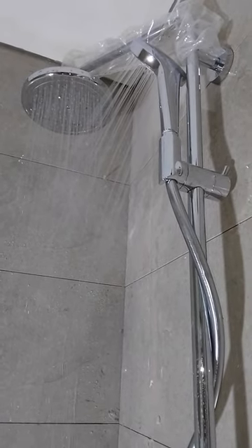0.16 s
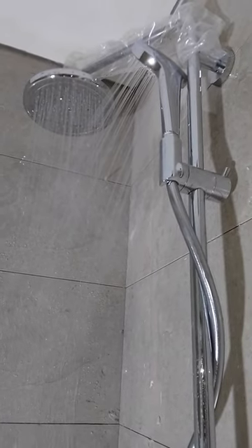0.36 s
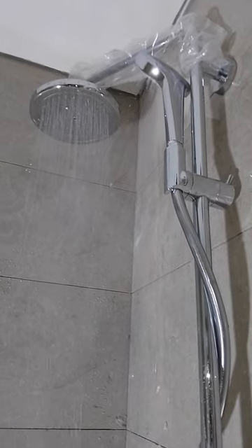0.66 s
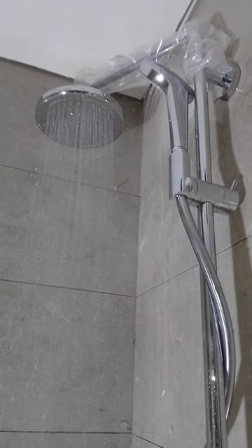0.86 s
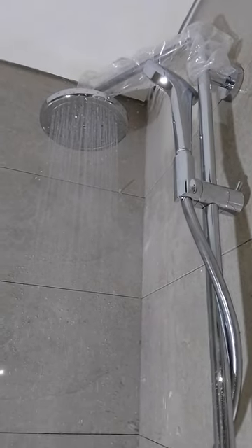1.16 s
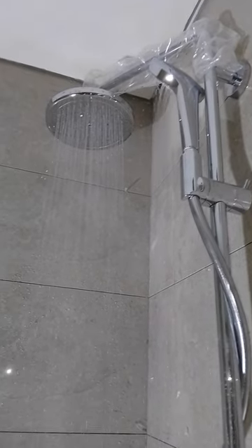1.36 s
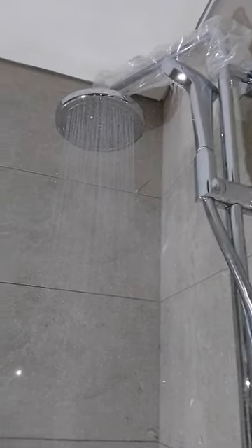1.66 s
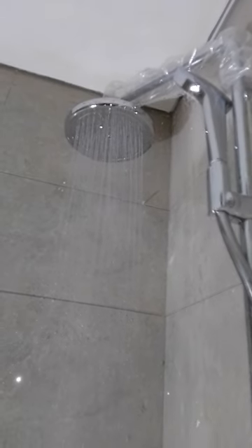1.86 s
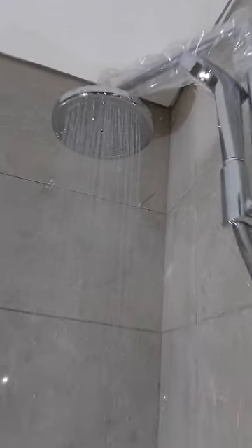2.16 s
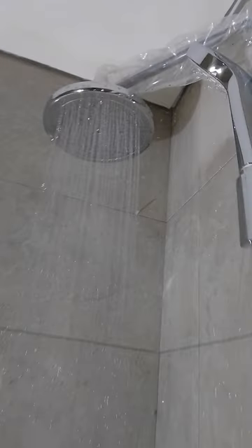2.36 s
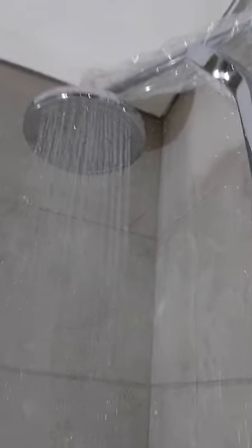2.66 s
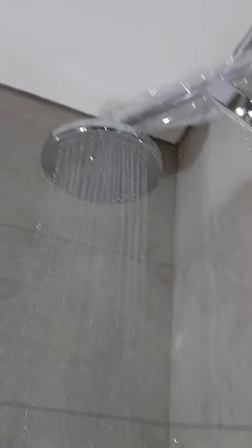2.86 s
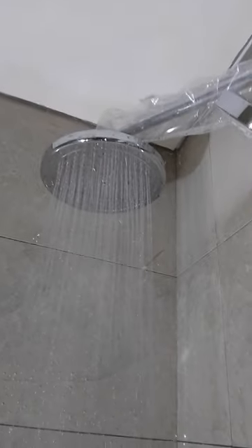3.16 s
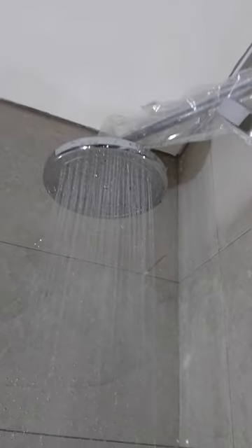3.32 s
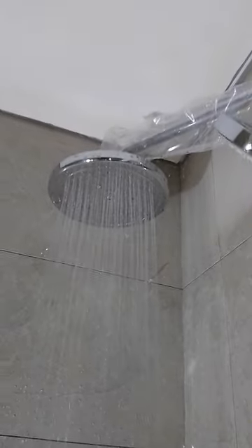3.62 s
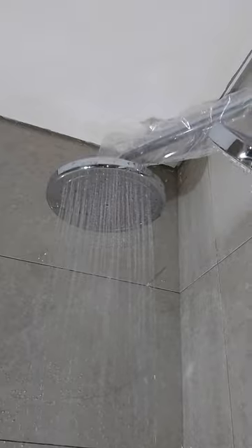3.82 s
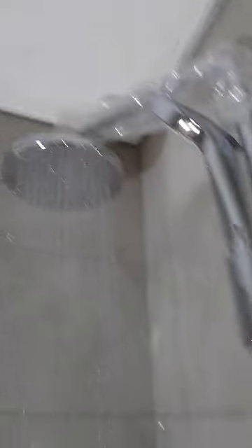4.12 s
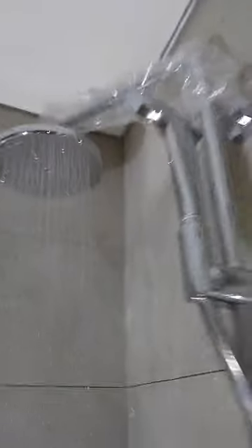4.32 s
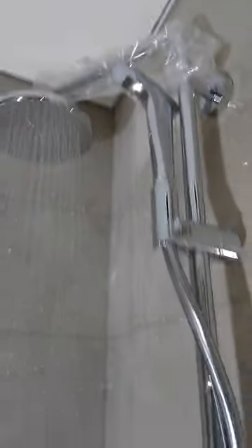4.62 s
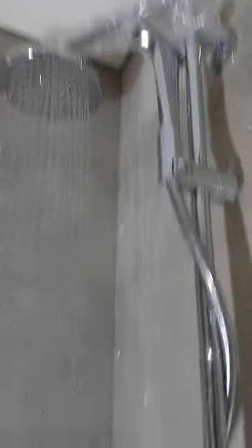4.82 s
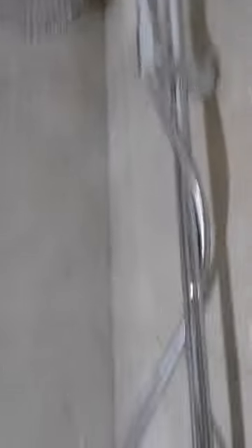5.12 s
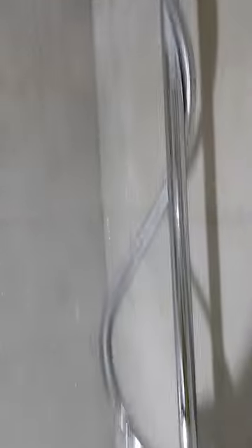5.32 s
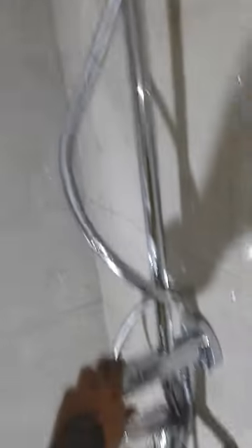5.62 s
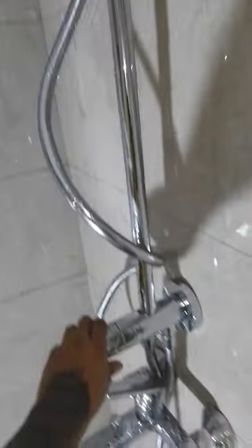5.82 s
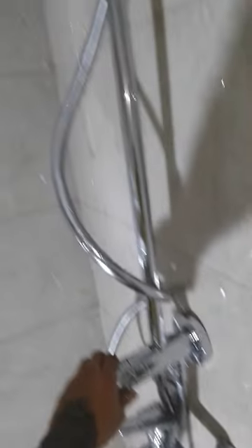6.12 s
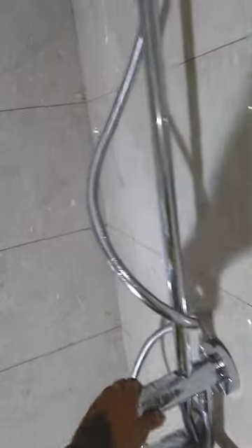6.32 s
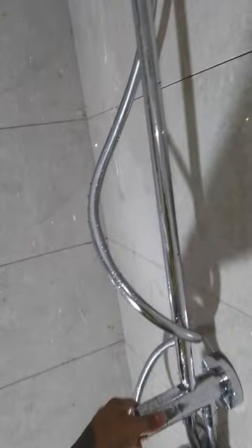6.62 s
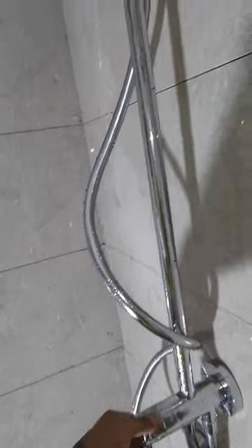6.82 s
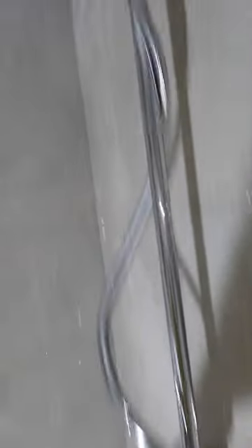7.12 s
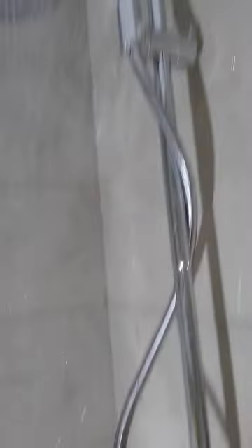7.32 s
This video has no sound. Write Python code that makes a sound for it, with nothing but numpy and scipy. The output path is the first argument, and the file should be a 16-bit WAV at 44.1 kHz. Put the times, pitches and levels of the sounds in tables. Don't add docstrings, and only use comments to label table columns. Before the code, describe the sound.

Crisp, airy shower water patters on tile, crackling with near drops, thinned by a phone's noise reduction, over a barely audible low hum.

```python
import sys
import numpy as np
from scipy import signal
from scipy.fft import rfft, irfft, next_fast_len
from scipy.io import wavfile
from scipy.ndimage import uniform_filter1d, minimum_filter1d, map_coordinates

SR = 44100
rng = np.random.default_rng(int(sys.argv[2]) if len(sys.argv) > 2 else 0)


def transcribe(signal):
    frames = np.atleast_2d(signal).T
    limited = np.clip(frames, -1, 1)
    pcm = np.round(limited * 32767).astype(np.int16)
    wavfile.write(sys.argv[1], SR, pcm)


def rack_gain(trim_db):
    fader = np.asarray(trim_db, float)
    return 10 ** (fader / 20)


N = 329868


def unit(x):
    return x / np.sqrt(np.mean(x ** 2) + 1e-20)


def curves(rows, times):
    s, *cols = np.transpose(rows)
    return [np.interp(times, s, c) for c in cols]


def wobble(rate):
    knot_position = np.arange(N) * np.clip(rate, .1, 120) / SR
    return map_coordinates(rng.standard_normal(1000), [knot_position])


def coloured(x, points):
    m = next_fast_len(N + 8192)
    f, db = np.transpose([(1, -120)] + list(points) + [(SR / 2, -60)])
    hz = np.fft.rfftfreq(m, 1 / SR)
    gain = rack_gain(np.interp(np.log(hz + 1), np.log(f + 1), db))
    cepstrum = irfft(np.log(gain), m)
    cepstrum[1:m // 2] *= 2
    cepstrum[m // 2 + 1:] = 0
    return irfft(rfft(x, m) * np.exp(rfft(cepstrum)), m)[:N]


def field(shape, bins, frames):
    rows = np.arange(shape[0]) / np.clip(bins, 1.5, 50)
    cols = np.arange(shape[1]) / np.clip(frames, 1.5, 50)
    knots = rng.standard_normal((shape[0], shape[1]))
    knots = knots[:int(rows[-1]) + 2, :int(cols[-1]) + 2]
    return unit(map_coordinates(knots, np.meshgrid(rows, cols, indexing="ij"), order=2))


def patchy(x, patchy_db):
    z = signal.stft(x, nperseg=256)[2]
    gain = rack_gain(patchy_db * field(z.shape, bins=5.97, frames=12))
    return unit(signal.istft(z * gain, nperseg=256)[1][:N])


def droplets(count, top_hz, spread_db, life, hiss):
    when, pitch, size, turn = rng.random((count, 4)).T[:, :, None]
    n = np.arange(96)
    tone = np.sin(2 * np.pi * (pitch * top_hz * n / SR + turn))
    ring = tone * (1 - np.exp(-n / 2)) * np.exp(-n / (life * SR))
    loudness = rack_gain(-spread_db * np.log(size + 0.02))
    places = (when * N).astype(int) + n
    rings = np.bincount(places.ravel(), (loudness * ring).ravel(), N)[:N]
    return unit(rings) + hiss * rng.standard_normal(N)


def spray(near, facing, flutter):
    # (frequency [Hz], level [dB])
    spray_colour = [(2500, -33.5), (4500, -20), (6000, -13.5), (8000, -8.5), (9400, -3.5), (10400, 0),
                    (11800, -3), (13500, -6.5), (15700, -9.5), (17000, -16.5)]
    patter = droplets(count=16000, top_hz=17150, spread_db=1.5, life=0.00028, hiss=1.58)
    patter = patchy(coloured(patter, spray_colour), patchy_db=0.79)
    body = signal.sosfiltfilt(signal.butter(2, 8000, fs=SR, output="sos"), patter)
    patter = patter + (rack_gain(facing) - 1) * body
    return rack_gain(-19.5 + near + flutter) * patter


def splash(near, flutter):
    # (frequency [Hz], level [dB])
    splash_colour = [(600, -28.5), (1200, -11.5), (2000, -7.5), (3000, -2.5), (4200, 2), (6000, -12)]
    # (time [s], level [dB])
    sloshes = [
        (.237, 6.5),
        (1.36, 1.5),
        (2.65, 4.5),
        (3.77, 0.5),
        (5.13, 3),
        (5.71, 0),
        (6.23, 2),
        (7.4, 4.5),
    ]
    rise_s, fall_s = 0.012, 0.061
    t = np.arange(N) / SR
    level_db = -40 + 0.98 * near + 0.45 * wobble(8)
    for s, db in sloshes:
        level_db += db * np.exp(np.where(t < s, (t - s) / rise_s, (s - t) / fall_s))
    drops = droplets(count=5000, top_hz=6290, spread_db=3.0, life=0.0005, hiss=3.8)
    drops = patchy(coloured(drops, splash_colour), patchy_db=-0.5)
    return rack_gain(level_db + 0.56 * flutter) * drops


def drain(near, facing):
    # (frequency [Hz], level [dB])
    drain_colour = [(175, -27), (215, -5), (290, 0), (500, 0), (900, -2), (1500, -5), (3000, -3)]
    level_db = -52.5 + 0.23 * near + 0.55 * facing + 0.81 * wobble(8)
    rush = patchy(coloured(rng.standard_normal(N), drain_colour), patchy_db=-0.54)
    return rack_gain(level_db) * rush


def water():
    # (time [s], level [dB])
    flow = [(0, -18.5), (.08, -23.5), (.3, -24.5), (.6, -22.5), (1.15, -22), (1.35, -19.5), (1.7, -18.5),
            (2.35, -19.5), (2.6, -19), (3.6, -19), (4.1, -19), (4.9, -19.5), (5.4, -20), (5.65, -22),
            (6.75, -21), (7.0, -24), (7.2, -25.5), (7.48, -23)]
    # (time [s], level below 8 kHz [dB])
    turning = [(0, -1), (1.2, -1), (2, -3.5), (3, -1.5), (4, -2), (5, -3), (5.5, 2), (5.9, 5), (6.2, 2),
               (6.8, 3), (7.1, 4), (7.48, -3.5)]
    # (time [s], level [dB])
    surges = [(.11, -1), (.37, 3.5), (.6, 1.5), (.68, -2.5), (.81, 1), (1.06, -2), (1.17, -1.5),
              (1.21, 2.5), (1.26, -4), (1.295, 2), (1.34, 1.5), (1.63, 1), (2.12, 3.5), (2.3, 1.5),
              (2.68, 3.5), (2.87, -2), (2.99, 3), (3.04, 0), (3.17, 0.5), (3.21, -2), (3.29, -3), (3.44, 0),
              (3.8, -3), (3.97, -2.5), (5.14, -1.5), (5.39, 3), (5.48, -2.5), (5.63, -2), (5.79, 3),
              (7.23, -3), (7.35, -1.5)]
    spit_s = 0.013
    t = np.arange(N) / SR
    near = curves(flow, t)[0] + 19.5
    facing = curves(turning, t)[0]
    spits = sum(db * np.exp(-((t - s) / spit_s) ** 2) for s, db in surges)
    flutter = 0.31 * wobble(14) + 0.23 * wobble(45) + spits
    return spray(near, facing, flutter) + splash(near, flutter) + drain(near, facing)


def rumble():
    # (frequency [Hz], level [dB])
    rumble_colour = [(15, -19), (30, -13), (46, -5), (56, -5), (70, -11.5), (110, -7.5), (160, -24.5),
                     (250, -40)]
    t = np.arange(N) / SR
    pipe = rack_gain(-84 + 3 * wobble(6)) * np.sin(2 * np.pi * 887 * t + 2.3 * wobble(25))
    mains = rack_gain(-71 + 2.5 * wobble(9)) * np.sin(2 * np.pi * 51 * t + 1.2 * wobble(8))
    pulsing = rack_gain(-65 + 1.2 * wobble(7.7) + 1.3 * wobble(17))
    return pulsing * unit(coloured(rng.standard_normal(N), rumble_colour)) + pipe + mains


def bursts():
    # (time [s], peak level [dB], pitch [Hz])
    nearest = [(0.154, -12, 10800), (0.191, -16, 10700), (0.2268, -10, 10100), (0.3561, -3, 8800),
               (0.664, -11, 10700), (0.7636, -13, 9800), (0.9755, -7, 11200), (1.0212, -11, 13700),
               (1.129, -2, 9700), (1.2383, -2, 10200), (1.457, -8, 9900), (1.7022, -6, 10400),
               (2.5455, 1, 10500), (2.5856, -12, 9900), (2.5921, 1, 10500), (2.782, -11, 10100),
               (2.7954, -5, 10200), (2.901, -2, 11000), (2.9079, -1, 10100), (2.9263, -4, 10800),
               (2.9434, -10, 10400), (3.178, -2, 9800), (3.2227, -7, 9900), (3.2549, 2, 9750),
               (3.4534, 1, 11400), (3.7276, -7, 13000), (3.767, -6, 12000), (3.7759, -1, 10800),
               (3.852, -2, 8700), (3.9296, 0, 10200), (4.0599, -6, 10000), (4.1756, -2, 10700),
               (4.1839, -1, 11100), (4.2165, -15, 11400), (4.4211, -2, 10100), (4.555, -5, 10900),
               (4.7266, -8, 9800), (5.7236, -9, 9100), (5.7954, -4.5, 10700), (5.9381, -8, 9300),
               (6.0388, -5, 9200), (6.1338, -7, 10700), (6.15, -6, 13500), (6.25, -1, 11200),
               (6.2862, 2, 10200), (6.2937, -4, 10500), (6.4289, -7, 9500), (6.497, -12, 10500),
               (6.5067, -9, 10700), (6.6918, -2, 11000), (6.7949, -2, 10300), (6.8178, -7, 10900),
               (6.8914, -2, 10900), (6.9456, -17, 10100), (6.9859, -7, 10800), (7.062, -9, 10500),
               (7.1287, -15, 9200), (7.2684, -9, 11000), (7.3029, -8, 10000), (7.3995, -8, 10600)]
    # (time [s], peak level [dB], pitch [Hz])
    more_near = [(0.0324, -14, 10200), (0.2806, -11, 11900), (0.5069, -10, 10600), (0.5292, -9, 10200),
                 (0.7488, -13, 10700), (0.7917, -12, 11500), (0.8175, -9, 11000), (0.8531, -7, 9900),
                 (0.8744, -12, 9600), (0.907, -12, 10800), (1.2311, -8, 10700), (1.637, -6, 10300),
                 (1.8742, -9, 10700), (2.1305, -9, 9100), (2.3511, -13, 10500), (2.6113, -13, 10200),
                 (2.6767, -9, 10600), (2.8195, -9, 11300), (2.9182, -13, 10400), (2.9827, -9, 10700),
                 (2.9988, -9, 10700), (3.0035, -9, 10400), (3.23, -9, 10400), (3.321, -3, 10000),
                 (3.874, -7, 10100), (3.9885, -14, 10700), (3.992, -11, 10100), (4.0261, -12, 11700),
                 (4.0804, -6, 11400), (4.104, -6, 10700), (4.1287, -1, 10200), (4.2747, -11, 11500),
                 (4.292, -10, 11200), (4.4386, -10, 11000), (4.4434, -9, 10600), (4.7137, -9, 11400),
                 (4.746, -15, 10400), (5.1763, -13, 10700), (5.2551, -12, 11000), (5.4073, -10, 10900),
                 (5.4349, -10, 11900), (5.5826, -10, 10400), (5.7185, -13, 11300), (5.78, -9, 9900),
                 (6.0433, -10, 10100), (6.2407, -8, 10200), (6.2981, -10, 9900), (6.565, -9, 8100),
                 (6.5791, -9, 10500), (6.6755, -10, 9000), (6.7528, -10, 11000), (6.8015, -10, 11500),
                 (6.9581, -12, 11500), (7.0112, -7, 10900), (7.0183, -10, 11100), (7.1184, -13, 10700),
                 (7.1476, -14, 11900), (7.2881, -11, 9500), (7.2938, -14, 10300), (7.3154, -14, 11500)]
    # (time [s], peak level [dB], pitch [Hz])
    fatter = [(0.1884, -29, 5600), (0.5695, -31, 5100), (0.8996, -26, 5200), (1.1847, -33, 4900),
              (1.2383, -27, 4800), (2.6797, -24, 5600), (3.6676, -25, 5500), (4.1072, -28, 5200),
              (4.1756, -27, 5200), (4.3075, -31, 5000), (5.1391, -22, 5700), (5.2515, -17, 5600),
              (5.5152, -22, 4600), (5.612, -14, 5700), (5.8812, -19, 5400), (6.2865, -25, 5500),
              (6.409, -16, 5700), (6.5177, -24, 5500), (6.5657, -17, 5600), (6.9862, -25, 5700),
              (7.1179, -28, 5600), (7.2892, -32, 5400), (7.2947, -32, 5500), (7.409, -25, 4800),
              (7.4489, -32, 5300)]
    tick_cycles, ring_cycles = 1.5, 95
    out, t = np.zeros(N + SR), np.arange(600) / SR
    drops = np.vstack([nearest, more_near, fatter])
    for (s, db, hz), turn in zip(drops, rng.random((len(drops), 1))):
        rise = tick_cycles / hz
        u = t / rise
        tick = 0.85 * (u * np.exp(1 - u)) ** 2
        ring = 0.55 * (1 - np.exp(-u ** 2)) * rack_gain(-60 * t * hz / ring_cycles)
        tone = np.sin(2 * np.pi * (hz * t + turn))
        puff = signal.lfilter([1, 0, -1], [1, 0, .5], rng.standard_normal(len(t)))
        burst = (tick + ring) * (tone + 0.071 * puff)
        out[round((s - rise) * SR):][:len(t)] += rack_gain(min(db, -2) - 1) * burst
    return out[:N]


def gurgles():
    # (time [s], pitch [Hz], length [s], level [dB])
    bubbles = [(0.2365, 3000, 0.015, -45), (0.238, 4200, 0.02, -52), (0.263, 2350, 0.027, -43),
               (0.571, 1640, .03, -46), (.585, 1560, .04, -52), (.576, 2650, .03, -52),
               (2.667, 1620, 0.03, -50), (6.538, 910, 0.055, -56), (6.547, 640, .04, -52),
               (6.705, 290, 0.086, -49), (7.379, 2100, .02, -44), (7.41, 4200, .02, -37)]
    out, t = np.zeros(N), np.arange(N) / SR
    flicker, drift = wobble(70), wobble(110)
    for s, hz, length, db in bubbles:
        level_db = db + 1.5 + 1.5 * flicker - 58 * ((t - s) / length) ** 2
        out += rack_gain(level_db) * np.sin(2 * np.pi * hz * t + 1.1 * drift)
    return out


def taps():
    # (time [s], peak level [dB])
    hits = [
        (1.238, -47),
        (2.7812, -35),
        (2.925, -32),
        (3.7667, -35),
        (4.175, -36),
        (4.725, -35),
        (5.5345, -53),
        (5.7954, -25),
        (5.9382, -37),
    ]
    n = np.arange(160)
    u = n / SR / .00003
    push = u * np.exp(-u) - 0.002 * np.sin(np.pi * n / len(n))
    out = np.zeros(N)
    for s, db in hits:
        out[round((s - .0001) * SR):][:len(n)] += rack_gain(db + 20.5) * push
    return out


def scene():
    mono = water() + rumble() + bursts() + gurgles() + taps()
    return np.array([mono, mono])


def suppressor(x):
    # (time [s], frequency [Hz])
    edge = [(0, 5400), (.4, 5450), (.55, 6200), (1.17, 6200), (1.33, 4850), (2.45, 4850), (2.62, 5500),
            (3.1, 4950), (3.32, 5950), (4.7, 5850), (5.05, 5250), (5.3, 4300), (5.9, 4050), (6.05, 4800),
            (6.85, 4950), (7.15, 5900), (7.3, 6050), (7.48, 5700)]
    # (start [s], end [s], centre [Hz], width [Hz], opening [0-1])
    leaks = [(0, .42, 4370, 170, 0.3), (0, .4, 3820, 130, 0.4), (1.9, 2.4, 3820, 180, 0.5),
             (0.803, 1.005, 5550, 300, 0.9), (.8, 0.952, 4630, 250, 0.8), (2.617, 2.95, 4160, 170, .95),
             (2.62, 3.0, 3660, 110, 0.9), (2.898, 3.2, 4200, 150, 0.5), (3.05, 3.2, 3650, 150, 0.4),
             (3.0, 3.123, 3200, 250, 0.7), (2.62, 3.2, 4960, 200, 0.8), (3.1, 3.4, 4500, 110, 0.5),
             (3.452, 3.954, 4460, 150, 0.73), (3.5, 4.0, 5400, 200, 0.5), (4.05, 4.65, 5170, 130, 0.6),
             (4.85, 5.302, 4250, 250, 0.6), (4.75, 5.2, 4950, 200, .75), (4.8, 5.15, 5400, 130, .5),
             (5.3, 5.9, 3700, 200, 0.2), (6.55, 6.8, 3850, 300, 0.5), (6.55, 6.85, 3300, 150, .35),
             (6.3, 6.85, 4450, 150, .4)]
    # (centre [Hz], lift [dB])
    leanings = [(2050, -2), (2350, -2), (2930, -0.5), (3510, 0), (3900, -0.5), (4690, 3), (5100, 3.5),
                (5370, 0.5), (5960, -3)]
    # (time [s], centre [Hz], half length [s], depth [dB])
    dropouts = [(0.067, 4750, 0.058, -26), (0.128, 2930, 0.044, -35), (0.308, 3630, 0.063, -32),
                (0.319, 5220, 0.038, -26), (1, 5900, 0.04, -21), (1.016, 5200, 0.067, -37),
                (1.027, 3520, 0.073, -33), (1.355, 4620, 0.046, -40), (1.573, 4600, 0.084, -35),
                (2.081, 3560, 0.052, -33), (2.314, 3530, 0.061, -25), (2.316, 4680, 0.038, -29),
                (2.421, 4550, 0.049, -23), (2.679, 4600, 0.052, -28), (2.801, 4540, 0.07, -25),
                (2.813, 3900, 0.077, -42), (2.824, 5330, 0.081, -31), (2.839, 3550, 0.1, -27),
                (2.937, 3050, 0.073, -22), (3.114, 3420, 0.064, -21), (3.201, 4700, 0.192, -22),
                (3.257, 3860, 0.073, -22), (3.683, 4180, 0.038, -29), (3.736, 4750, 0.093, -31),
                (3.747, 5850, 0.11, -32), (3.875, 4000, 0.082, -20), (3.884, 4650, 0.073, -23),
                (4.046, 5290, 0.067, -35), (4.241, 5540, 0.081, -24), (4.301, 4600, 0.09, -42),
                (4.577, 4130, 0.07, -25), (4.609, 4820, 0.073, -27), (4.615, 3170, 0.042, -31),
                (4.618, 5800, 0.081, -32), (4.656, 4000, 0.066, -32), (4.815, 3860, 0.042, -43),
                (4.888, 3520, 0.084, -26), (5.065, 3950, 0.041, -39), (5.306, 3860, 0.044, -22),
                (5.811, 3970, 0.16, -43), (6.1, 4720, 0.093, -46), (6.136, 3800, 0.067, -25),
                (6.159, 4270, 0.067, -29), (6.42, 2400, 0.06, -31), (6.554, 4700, 0.076, -24),
                (6.658, 3540, 0.074, -22), (6.789, 4760, 0.15, -30), (6.891, 4700, 0.061, -18)]
    depth_db, soft_hz = 9, 120
    hz, t, z = signal.stft(x, SR, nperseg=2048, noverlap=1536)
    low = slice(0, 400)
    hz, shape = hz[low, None], z[low].shape
    below = curves(edge, t)[0] - hz
    fray_hz = 130 * field(shape, bins=4, frames=18) + 260 * field(shape, bins=4, frames=4)
    shut = 1 / (1 + np.exp(np.clip((fray_hz - below) / soft_hz, -30, 30)))
    flicker = 1 + .4 * field(shape, bins=5, frames=4)
    for start, end, centre_hz, width_hz, opening in leaks:
        inside = np.clip(np.minimum(t - start, (end - t) / 2) / 0.044, 0, 1)
        band = np.exp(-((hz - centre_hz) / width_hz) ** 4)
        shut *= np.clip(1 - opening * flicker * inside * band, 0, 1)
    lift = sum(db * np.exp(-((hz - centre_hz) / 65) ** 2) for centre_hz, db in leanings)
    threshold = .92 + .19 * lift - .5 * np.exp(-(below / 1700) ** 2) + np.clip((1500 - hz) / 700, 0, 3)
    overshoot = field(shape, bins=5, frames=3.2) + .6 * field(shape, bins=2.5, frames=6)
    holes = shut * np.clip((unit(overshoot) - threshold) / .35, 0, 1)
    holes_db = -33 * holes + .5 * lift
    for s, centre_hz, half, db in dropouts:
        moment = np.exp(-((t - s) / (.7 * half)) ** 4)
        band = np.exp(-((hz - centre_hz) / (2.5 * -db - 10)) ** 4)
        holes_db += db * moment * band
    waver = 0.97 * field(shape, bins=4, frames=6) * (hz > 200)
    z[730:] = 0
    z[low] *= rack_gain(holes_db) * rack_gain(-shut * (depth_db + waver))
    return signal.istft(z, SR, nperseg=2048, noverlap=1536)[1][:N]


def limiter(x, ceiling):
    needed = np.minimum(1, ceiling / (np.abs(x) + 1e-9))
    return x * uniform_filter1d(minimum_filter1d(needed, size=81), size=41)


def strays():
    # (time [s], low edge [Hz], high edge [Hz], level [dB])
    mismatches = [
        (1.395, 13100, 15800, -30),
        (2.0, 5670, 7150, -42),
        (2.625, 11000, 13400, -29),
        (4.485, 4930, 8550, -41),
    ]
    out, bell = np.zeros(N), np.hanning(2048) ** .5
    for s, low_hz, high_hz, db in mismatches:
        bandpass = signal.butter(8, [low_hz, high_hz], "band", fs=SR, output="sos")
        band = signal.sosfilt(bandpass, rng.standard_normal(len(bell)))
        out[round(s * SR) - len(bell) // 2:][:len(bell)] = rack_gain(db) * unit(band) * bell
    return out


def roll_off(x):
    return signal.sosfilt(signal.butter(12, 15980, fs=SR, output="sos"), x)


def record(dry):
    mono = limiter(suppressor(dry[0]), ceiling=.7)
    side = strays()
    return roll_off(np.array([mono + side, mono - side]))


dry = scene()
out = record(dry)
transcribe(out)
```